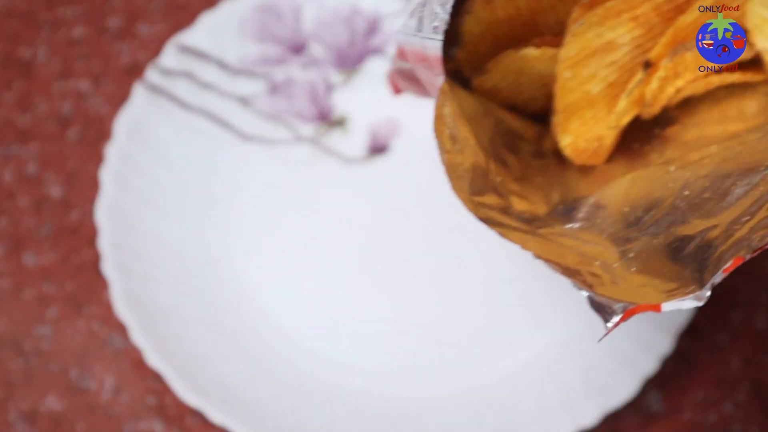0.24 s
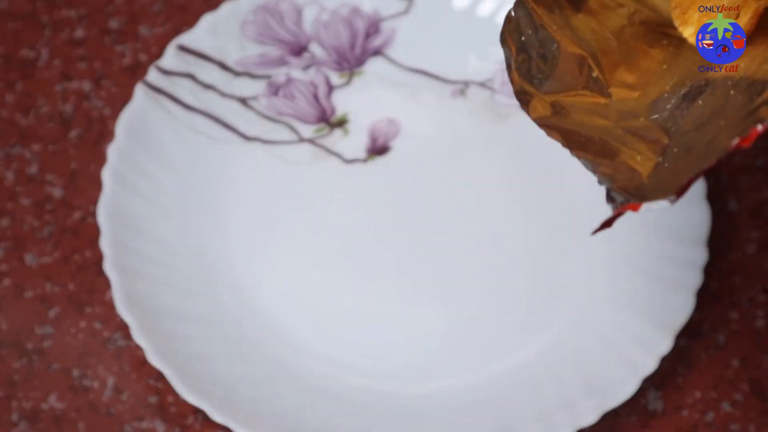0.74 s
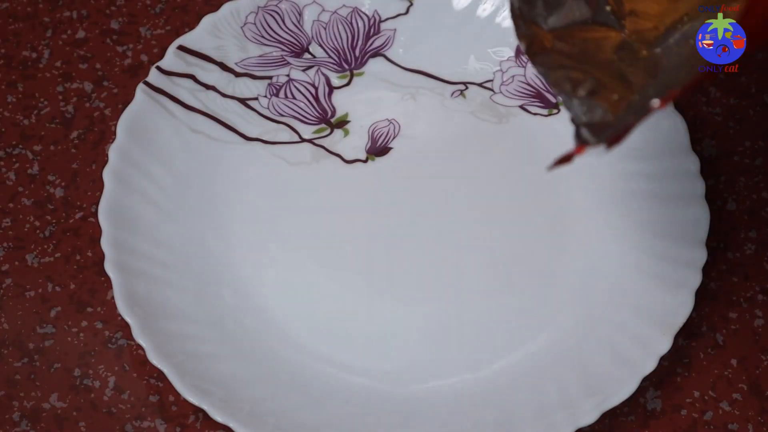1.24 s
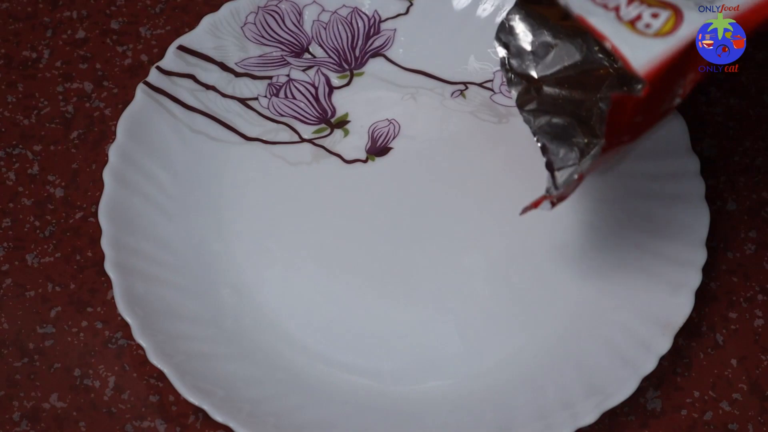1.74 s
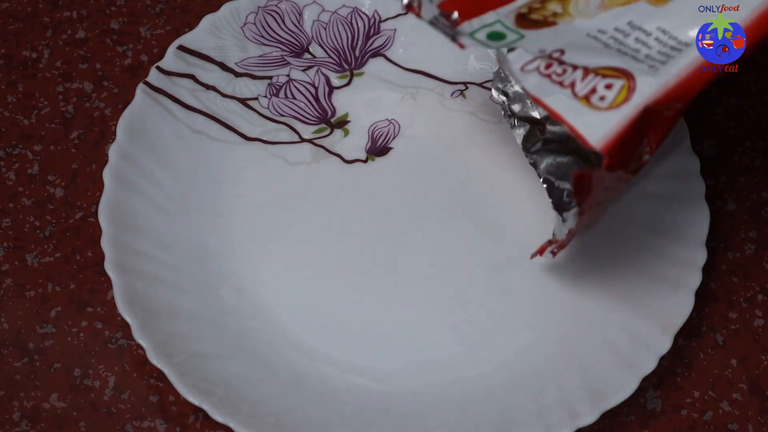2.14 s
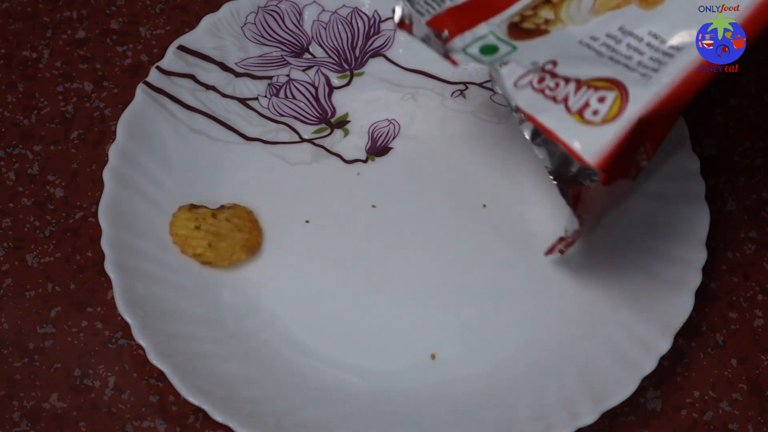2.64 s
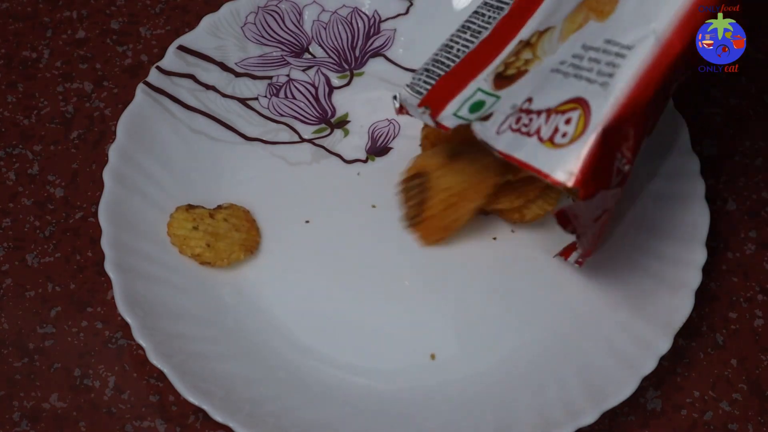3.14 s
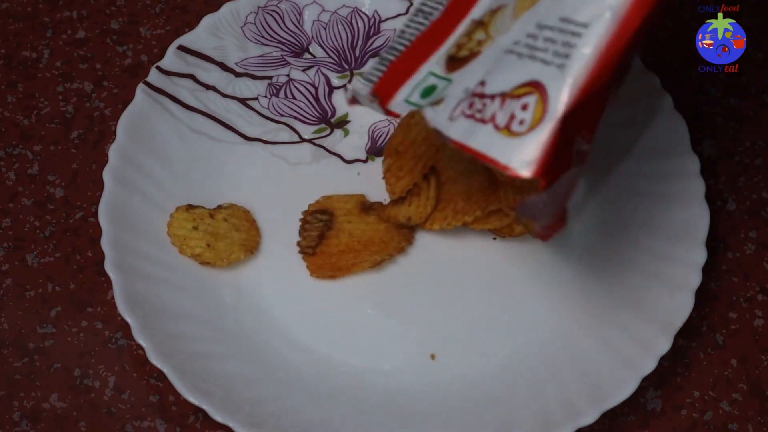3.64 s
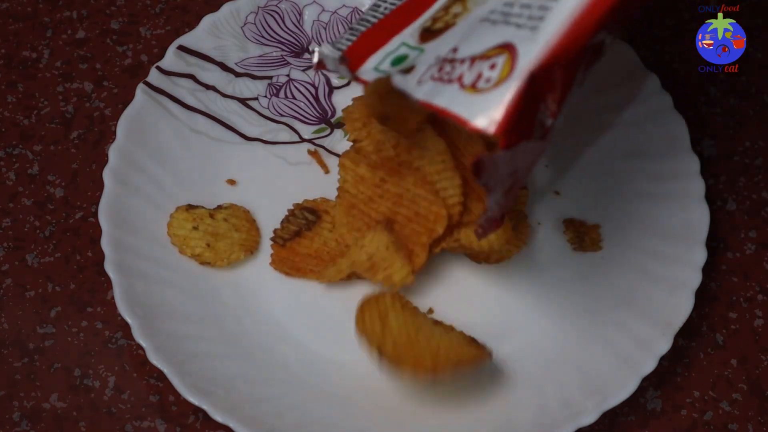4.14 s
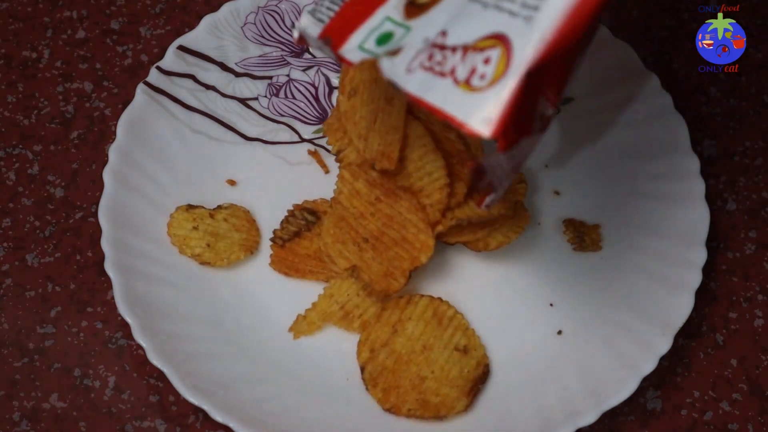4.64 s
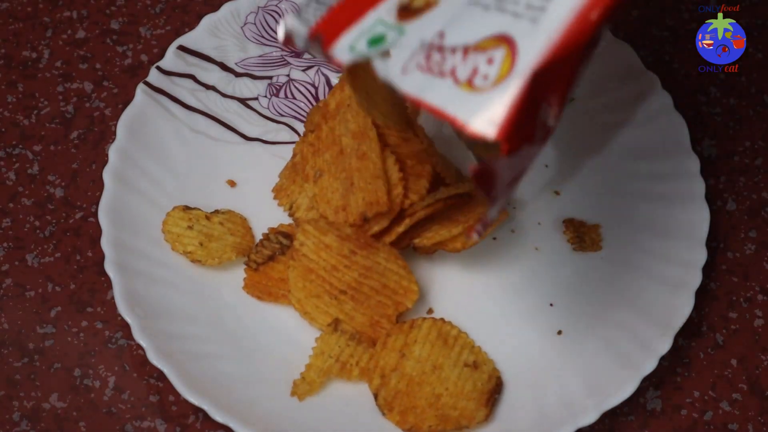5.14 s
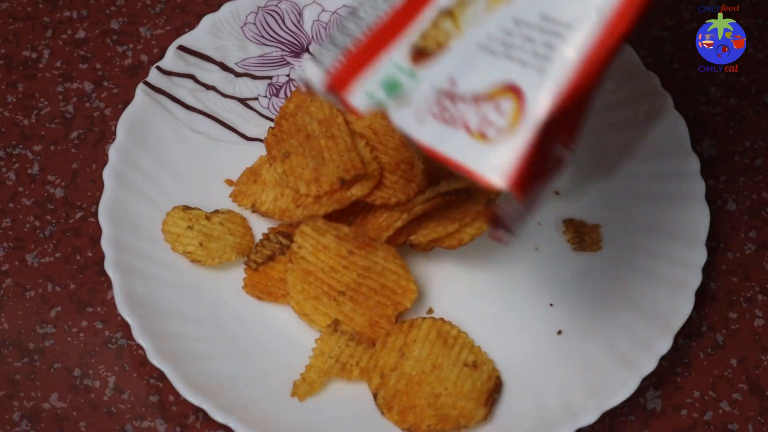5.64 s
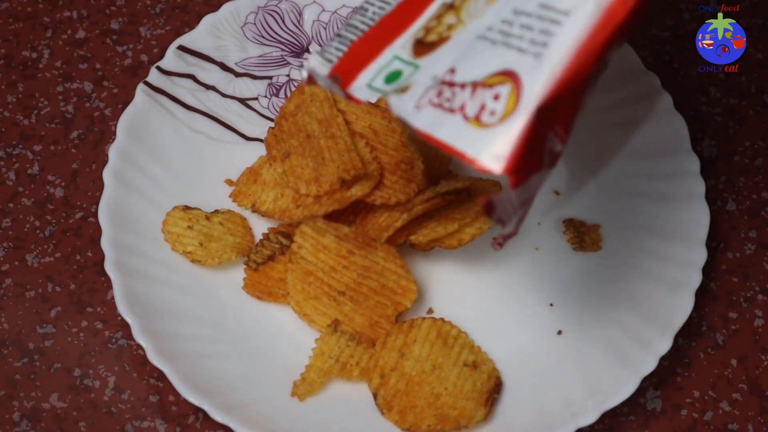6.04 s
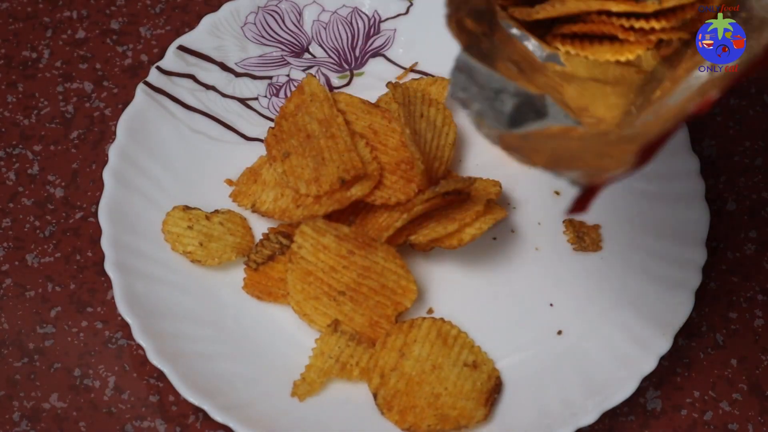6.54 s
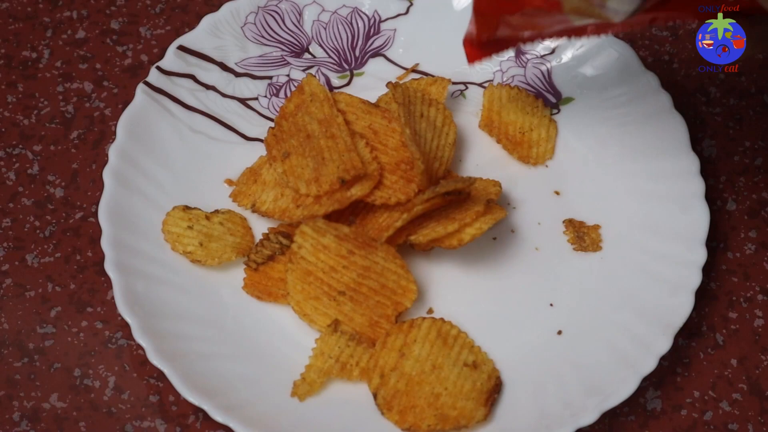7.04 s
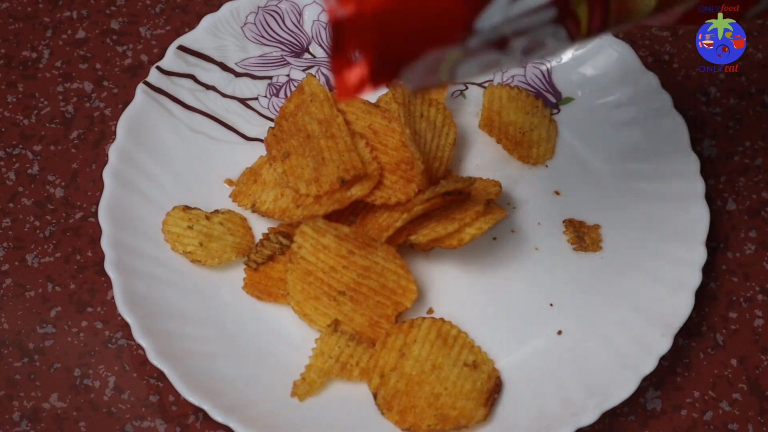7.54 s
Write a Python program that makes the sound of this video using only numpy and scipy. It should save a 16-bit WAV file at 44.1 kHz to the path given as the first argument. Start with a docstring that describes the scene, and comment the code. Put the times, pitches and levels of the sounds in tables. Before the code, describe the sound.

Short dry rustles and soft low hand bumps come first, then a near pause. Sharp crinkles return as the first crisps strike a china plate and ring it. The loudest foil crackle and sliding clatter come soon after, followed by lighter knocks and clinks, a quieter scraping, and a last burst of snapping foil. Close stereo pickup, bright reflections, short dense room tail, faint low background.

```python
"""Snack packet emptied onto a plate

A foil packet is tilted and shaken over a ceramic plate, close to the microphone in a small hard room.
Creases snap as click runs; foil and sliding crisps are pitched grains whose level follows the moves.
Crisps knock, drop out, ring the plate's modes and clink on the pile; the dragging mouth hums.
The hands bump softly at low pitch; early scatter and a dense stereo tail carry the clicks on.
"""
import sys
import numpy as np
from scipy import signal
from scipy.fft import rfft, irfft, next_fast_len
from scipy.io import wavfile
from scipy.ndimage import uniform_filter1d

SR = 44100
rng = np.random.default_rng(int(sys.argv[2]) if len(sys.argv) > 2 else 0)


def store_wav(level_fs):
    """Save 16-bit WAV to argv[1]."""
    pcm = np.round(np.clip(np.atleast_2d(level_fs), -1, 1) * 32767)
    wavfile.write(sys.argv[1], SR, pcm.T.astype(np.int16))


N = 343098
TIME = np.arange(N) / SR
TOP_HZ = 16200  # pitch ceiling of the grains and final cutoff

# spectrum of snaps and landing ticks: f/Hz, gain/dB
SNAP_SPECTRUM = [(100, -18), (350, -2.5), (1900, -4.5), (4200, -5), (6300, 0), (10500, 6.5), (12000, 0.5),
                 (15500, -27.5)]


def undb(db):
    """Decibels to amplitude gain."""
    return 10 ** (np.asarray(db) / 20)


def unit(x):
    """Scale to an rms of one."""
    return x / np.sqrt(np.mean(x ** 2))


def at_hz(hz, points):
    """Interpolate (f/Hz, value) points on a log-frequency axis."""
    f, value = np.transpose(points)
    return np.interp(np.log(hz + 1), np.log(f), value)


def colour(x, *spectra):
    """Minimum-phase filter, by folded cepstrum, whose gain is the sum of (f/Hz, gain/dB) spectra."""
    size = 2 * next_fast_len(x.shape[-1] // 2 + 2048)
    half = size // 2
    hz = np.arange(half + 1) * SR / size
    gain_db = sum(at_hz(hz, s) for s in spectra)
    cepstrum = irfft(np.log(undb(gain_db)))
    cepstrum[1:half] *= 2
    cepstrum[half + 1:] = 0
    response = np.exp(rfft(cepstrum))
    return irfft(rfft(x, size) * response)[..., :x.shape[-1]]


def add(out, s, sound):
    """Mix a sound into every channel of out, starting at s seconds."""
    start = max(int(s * SR), 0)
    part = sound[..., :N - start]
    out[:, start:start + part.shape[-1]] += part


def diffuse(size, null_hz=1500):
    """Stereo noise spectra as from two spaced microphones: alike in the bass, unrelated in the treble."""
    hz = np.arange(size // 2 + 1) * SR / size
    mid, side = rfft(rng.standard_normal((2, size)))
    alike = .88 * np.sinc(hz / null_hz)
    common = mid * np.sqrt(1 + alike)
    opposed = np.outer([1, -1], side * np.sqrt(1 - alike))
    return hz, (common + opposed) / np.sqrt(2)


def burst(decay_s, size=2048):
    """Exponentially decaying noise of unit energy."""
    x = rng.standard_normal(size) * np.exp(-TIME[:size] / decay_s)
    return x / np.linalg.norm(x)


def buckle(mean_delay_ms, first=1.0, count=10):
    """A crease gives way in one sharp click and a quick run of smaller ones; unit energy."""
    x = first * burst(0.00023)
    delays = np.minimum(rng.exponential(size=count), 4)  # in mean delays
    for delay, strength in zip(delays, rng.random(count)):
        late = int(delay * mean_delay_ms * SR / 1000)
        x += np.roll(burst(.0005), late) * strength / 2
    return x / np.linalg.norm(x)


def crunch(hz, mean_delay_ms=3):
    """Ridges of two crisps catch in a quick click run, coloured by the crisp's pitch; unit energy."""
    # spectrum of a knock: f/pitch [multiple], gain/dB
    spectrum = [(.3, -25), (.7, -9.5), (1, 2), (1.6, -10.5), (4, -27), (9, -51.5)]
    x = colour(buckle(mean_delay_ms), [(multiple * hz, db) for multiple, db in spectrum])
    return x / np.linalg.norm(x)


def ring(modes, size=20000):
    """Struck modes (f/Hz, level/dB, t60/s); each blow lands elsewhere and so weights them anew."""
    hz, db, t60_s = np.transpose(modes)[:, :, None]
    t = TIME[:size]
    gain = undb(db + rng.standard_normal(hz.shape))
    fade = np.exp(-np.log(1000) * t / t60_s)
    return np.sum(gain * np.sin(2 * np.pi * hz * t) * fade, axis=0)


def grains(rate, spread_db, low_hz, octaves, cycles, size, run_s=0):
    """Random tiny breaks, rate per second, mostly faint, each a decaying sine within octaves above low_hz."""
    when, strength, pitch, phase = rng.random((int(rate * N / SR), 4)).T[:, :, None]
    start, n = (when * N).astype(int), np.arange(size)
    if run_s:  # one crisp or facet rattles for run_s near its own pitch, then another takes over
        run_pitch = rng.random(N)[start // int(run_s * SR)]
        pitch = .85 * run_pitch + .15 * pitch
    base_hz = np.broadcast_to(low_hz, N)[start]
    hz = np.minimum(base_hz * 2 ** (octaves * pitch), TOP_HZ)
    gain = undb(-spread_db * np.log(.98 * strength + .02)) * hz
    fade = np.exp(-n * hz / (cycles * SR))
    waves = gain * fade * np.sin(2 * np.pi * (hz * n / SR + phase))
    return unit(np.bincount((start + n).ravel(), waves.ravel(), minlength=N)[:N])


def jamming(depth_db=2.5, hold_s=.024):
    """Uneven gain of things that slide, catch and break free: a random dB step every hold_s."""
    steps = np.repeat(rng.standard_normal(4000), int(hold_s * SR))[:N]
    return undb(abs(depth_db) * uniform_filter1d(steps, 128))


def stroke(start_s, length_s, release_db_per_s):
    """Gain of one movement of the hand: a quick rise, a slowly easing hold, a release."""
    attack_s, sag_db_per_s = 0.019, 27.5
    t = np.maximum(TIME - start_s, 0)
    loss_db = sag_db_per_s * t + release_db_per_s * np.maximum(t - length_s, 0)
    return np.minimum(t / attack_s, 1) * undb(-np.minimum(loss_db, 200))


def efforts():
    """Gains of foil bending and crisp sliding; overlapping moves add in power."""
    # tilts and shakes of the packet: start/s, length/s, foil effort/dB, sliding effort/dB
    moves = [(0.086, 0.19, -55.5, -56), (0.328, 0.11, -47, -62.5), (0.416, 0.11, -46, -46),
             (0.526, 0.2, -53.5, -54.5), (1.146, 0.11, -51, -50.5), (1.416, 0.072, -73.5, -63),
             (2.085, 0.54, -71, -85), (2.275, 0.09, -49, -52), (2.411, 0.049, -40.5, -39),
             (2.567, 0.096, -38.5, -61), (2.78, 0.14, -45, -39.5), (2.89, 0.45, -35.5, -33),
             (3.046, 0.13, -27.5, -29), (3.207, 0.27, -37.5, -36.5), (3.556, 0.21, -39.5, -38.5),
             (3.723, 0.056, -37.5, -45.5), (3.928, 0.087, -46, -64), (4.013, 0.1, -36, -49),
             (4.248, 0.16, -42, -49.5), (4.724, 0.055, -43.5, -62), (4.758, 0.087, -38, -45),
             (4.82, 0.083, -40, -41), (5.045, 0.0093, -50.5, -55), (5.24, 0.14, -35, -42),
             (6.478, 0.14, -46.5, -59), (6.732, 0.048, -47.5, -56), (7.017, 0.01, -53, -76.5),
             (7.108, 0.15, -44, -43), (7.241, 0.1, -32.5, -39.5), (7.389, 0.21, -42, -46),
             (7.597, 0.1, -40.5, -77)]
    crisp_lag_s = 0.0015
    foil_relax_db_per_s, crisp_settle_db_per_s = 168.5, 158
    foil_power, sliding_power = 0, 0
    for s, length_s, foil_db, sliding_db in moves:
        bend = undb(foil_db) * stroke(s, length_s, foil_relax_db_per_s)
        slide = undb(sliding_db) * stroke(s + crisp_lag_s, length_s, crisp_settle_db_per_s)
        foil_power = foil_power + bend ** 2
        sliding_power = sliding_power + slide ** 2
    return np.sqrt(foil_power), np.sqrt(sliding_power)


def cavity():
    """Air resonance of the packet over time, higher while it is squeezed or pressed on the pile."""
    # nominal resonance: t/s, f/Hz, relative level/dB
    track = [(0.3, 586.4, 0), (0.601, 779, -7), (1.95, 398, 6), (2.45, 440, -0.5), (2.802, 377, -3),
             (4.15, 374, 5), (4.348, 723, -5), (4.849, 717, 3), (5.298, 605.3, 1), (6.799, 636, -2),
             (7.0, 370, -1.5)]
    times, *columns = np.transpose(track)
    return [np.interp(TIME, times, column) for column in columns]


def background():
    """Faint steady stereo noise, strongest in the bass."""
    # spectrum: f/Hz, gain/dB
    spectrum = [(25, -9), (105, 1), (200, -11), (400, -12), (1500, -30), (5000, -44), (12000, -54)]
    level_db = -67.5
    return undb(level_db) * unit(colour(irfft(diffuse(N)[1]), spectrum))


def bumps(hz=108, rise_s=0.014, gain_db=3, rub_db=-7, size=12000):
    """Soft pushes of the hands: low cycles that swell and fade, with a lingering rub of the fingers."""
    # the fingers shift their grip: t/s, number of bumps, level before gain_db/dB
    grips = [(0.01, 2, -46.5), (1.2, 1, -47.5), (1.771, 3, -50), (2.328, 1, -45), (2.528, 1, -45),
             (3.072, 1, -42), (3.464, 1, -48), (3.739, 1, -42.5), (4.762, 4, -44), (5.32, 3, -48),
             (6.184, 3, -56.5), (6.566, 1, -46), (6.84, 1, -49.5)]
    rub_spectrum = [(25, -10.0), (100, 13.5), (170, -1.0), (400, -23.5), (3000, -73.5)]
    gap_s = 0.11
    out, t = np.zeros((2, N)), TIME[:size]
    swell = t / rise_s * np.exp(1 - t / rise_s)
    linger = swell ** 0.084 * (1 - t / t[-1])
    for s, count, db in grips:
        for k in range(round(count)):
            jitter = min(k, 1) * 0.084 * rng.standard_normal()  # none on the first bump
            late_s = gap_s * (k + jitter)
            bump_hz = hz * np.exp(0.07 * rng.standard_normal())
            thud = np.sin(2 * np.pi * bump_hz * t)
            rub = unit(colour(irfft(diffuse(size)[1]), rub_spectrum))
            push = swell * thud + undb(rub_db) * linger * rub
            add(out, s + late_s, undb(db + gain_db) * push)
    return out


def handling(foil_db=2, sliding_db=1, clack_db=-11, air_db=-11, wall_db=-12.0):
    """Bending foil crackles brightly while the crisps grate and clack inside and stir the cavity."""
    # spectra: f/Hz, gain/dB
    foil_spectrum = [(800, -35.5), (2500, -3.5), (4300, 5.5), (6300, 5.5), (8000, 7), (10800, 8.5),
                     (12200, 1), (15000, -25)]
    sliding_spectrum = [(120, -17.5), (330, 3.5), (650, 0), (1100, 1.5), (2000, 3), (3200, 2.5),
                        (8000, -23)]
    foil_gain, sliding_gain = efforts()

    # a shifting crisp also dents the foil, so the two share their sharpest clicks
    both = grains(rate=450, spread_db=3.5, low_hz=4140, octaves=1.46, cycles=0.26, size=32)
    facets = grains(rate=1500, spread_db=4, low_hz=2700, octaves=2.2, cycles=10, size=300, run_s=.014)
    foil = unit(unit(colour(facets, foil_spectrum)) + 1.7 * unit(colour(both, foil_spectrum)))

    grating = grains(rate=1300, spread_db=4.2, low_hz=620, octaves=3, cycles=2.2, size=300)
    clacks = grains(rate=400, spread_db=3, low_hz=1100, octaves=2.1, cycles=12, size=1500, run_s=.022)
    cavity_hz, cavity_db = cavity()
    air = grains(rate=200, spread_db=1, low_hz=.88 * cavity_hz, octaves=.33, cycles=10, size=2500)
    air = air * undb(cavity_db)
    # the slack walls flap below the air resonance, less when they are pulled taut
    slack = (cavity_hz.min() / cavity_hz) ** 2
    walls = grains(rate=300, spread_db=3, low_hz=205, octaves=.8, cycles=3.5, size=2500) * slack
    boom = undb(air_db) * air + undb(wall_db) * walls
    grate = unit(colour(grating + both, sliding_spectrum))
    clack = undb(clack_db) * unit(colour(clacks, sliding_spectrum))
    sliding = unit(grate + clack + boom)
    return undb(foil_db) * foil * foil_gain + undb(sliding_db) * sliding * sliding_gain * jamming()


def drags(release_db_per_s=220):
    """The mouth of the packet sticks and slips, and each slip rings its cavity."""
    # drags of the mouth: start/s, length/s, level/dB
    pulls = [(0.148, 0.33, -62), (1.94, 0.19, -63.5), (5.339, 0.62, -53), (6.047, 0.019, -59),
             (6.749, 0.067, -57)]
    slips = grains(rate=90, spread_db=2, low_hz=.9 * cavity()[0], octaves=.2, cycles=10, size=4000)
    hum = unit(colour(slips, [(200, -25), (360, 0), (720, 0), (1400, -40)]))
    gain = sum(undb(db) * stroke(s, length_s, release_db_per_s) for s, length_s, db in pulls)
    return hum * jamming(depth_db=6) * gain


def snaps(gain_db=-4.0, mean_delay_ms=2.6):
    """Loud creases giving way, each with its own body and sheen."""
    # t/s, level before gain_db/dB, body below 1 kHz/dB, sheen above 6 kHz/dB
    creases = [(0.445, 10, 14.5, -8), (0.626, -3.5, -2, -7), (1.1684, 12.5, -9, -11), (2.421, 14, 0, -10.5),
               (2.766, 10, 0, -18), (2.8564, 13, -6.5, -9.5), (2.9032, 12, -1.5, -19), (2.936, 6, -1, -18),
               (3.042, 18, -0.5, -14), (3.0681, 18, 6.5, -9.5), (3.0787, 26.5, -13, -32),
               (3.141, 0.5, 3, 10.5), (3.3546, 14.5, -4, -18), (3.366, 9.5, 1, -11), (3.5356, 11, 0.5, -26),
               (3.801, -2.5, 9, -3), (4.056, 2, 4.5, -22), (4.8886, 16, -8, -5), (5.2626, 16.5, -4, -36),
               (5.507, -12, -19, 4.5), (5.5221, -2.5, -16, 2.5), (5.683, -15, -5.5, 5.5),
               (6.4955, -4, -26.5, -24.5), (6.762, -5, 1, 3.5), (7.222, 15.5, -18, -3.5),
               (7.2793, 13.5, 0.5, -27), (7.2891, 13.5, -15, -4.5), (7.294, 13, -4, -8),
               (7.31, 13.5, -16, -18), (7.3268, 15, -30, 1), (7.51, 14.5, -4.5, -14),
               (7.6008, 17.5, -19.5, -2)]
    out = np.zeros((1, N))
    for s, db, body_db, sheen_db in creases:
        tilt = [(300, body_db - 6.0), (850, body_db), (1700, 0.01), (4600, 0.01), (7500, sheen_db)]
        click = colour(buckle(mean_delay_ms), SNAP_SPECTRUM, tilt)
        add(out, s, undb(db + gain_db) * click)
    return out[0]


def knocks(gain_db=15.0):
    """Crisps knock and crunch on each other and the packet: short dull click runs, each at its pitch."""
    # t/s, f/Hz, level before gain_db/dB
    hits = [(0.531, 1120, -30.5), (0.5812, 1120, -21.5), (0.619, 1370, -25), (0.715, 1100, -33),
            (0.798, 1250, -35), (2.813, 1360, -15), (2.911, 1080, -21), (3.556, 2500, -22),
            (3.638, 1430, -25.5), (3.709, 2350, -24.5), (3.958, 4600, -30), (4.2677, 4160, -12),
            (4.411, 4600, -27.5), (5.583, 1880, -31), (5.6415, 780, -22.5), (5.7325, 743, -42),
            (5.7615, 2030, -37), (5.8194, 736, -26.5), (6.55, 1800, -29.5), (6.804, 1610, -36.5),
            (7.122, 1900, -30.5), (7.131, 3060, -24), (7.511, 1350, -18.5)]
    out = np.zeros((1, N))
    for s, hz, db in hits:
        add(out, s, undb(db + gain_db) * crunch(hz))
    return out[0]


def landings(plate_db=-0.5, size=20000):
    """A hard crisp ticks on the glaze and sets the plate ringing; gives ticks and rings."""
    # crisps landing: t/s, tick level/dB, ring level before plate_db and muffling/dB
    drops = [(2.5264, 7, -22.5), (2.5504, 8, -31), (2.6271, 3, -41), (3.2389, -4, -26), (3.338, 0, -26),
             (3.5372, -4.5, -31.5), (4.099, -4.5, -28), (4.267, 9.5, -18.5), (4.3166, 4, -37.5),
             (4.348, 1.5, -40), (4.8898, -8.5, -15), (5.182, -52, -33), (5.288, -12, -21.5)]
    # plate modes before muffling, the lowest two beating: f/Hz, level/dB, t60/s
    plate_modes = [(1840, -3, 0.33), (1850, -2.5, 0.31), (3170, -11.5, 0.097), (10650, -17.5, .2)]
    tick_tilt = [(600, -27.5), (1700, 3.0), (4600, 2.0), (7500, -6)]
    # the growing pile lowers the ring and speeds its decay, per second of pouring
    muffle_db_per_s, damping_db_per_s2 = 4.5, 112.5
    ticks, rings = np.zeros((2, 1, N))
    for s, tick_db, ring_db in drops:
        poured_s = s - drops[0][0]
        muffle_db = poured_s * (muffle_db_per_s + damping_db_per_s2 * TIME[:size])
        tick = colour(buckle(mean_delay_ms=0.92), SNAP_SPECTRUM, tick_tilt)
        add(ticks, s, undb(tick_db) * tick)
        add(rings, s, undb(plate_db + ring_db - muffle_db) * ring(plate_modes, size))
    return ticks[0], rings[0]


def tumbling(clink_db=-7):
    """Crisps out of the packet clink against each other on the pile, as hard as the packet is shaken."""
    # span of the tumbling: start/s, end/s
    span_s = (4.03, 6.5)
    taps = grains(rate=260, spread_db=2.5, low_hz=1250, octaves=2.1, cycles=16, size=2000, run_s=.03)
    on_pile = uniform_filter1d(1. * ((TIME > span_s[0]) & (TIME < span_s[1])), 4096)
    return undb(clink_db) * taps * on_pile * np.hypot(*efforts())


def clinks(t60_s=0.063, contact_db=14):
    """A loose crisp strikes the pile with a crunch and rings briefly at one pitch."""
    # t/s, f/Hz, ring level/dB
    strikes = [(4.157, 1504, -37), (4.174, 1527, -37), (4.207, 1530, -48.5), (4.421, 2088, -37),
               (4.703, 4180, -48), (4.7591, 1367, -35), (4.776, 1365, -32.5), (4.793, 1394, -33.5),
               (4.856, 2478, -27.5)]
    out = np.zeros((1, N))
    for s, hz, db in strikes:
        add(out, s, undb(db) * ring([(hz, 0, t60_s)]))
        add(out, s, undb(db + contact_db) * crunch(hz))
    return out[0]


def scatter(x, near_db=1, decay_s=0.0056, hold_s=.016, count=6):
    """Plate, table and moving packet throw clicks back within milliseconds, by paths that keep changing."""
    spectrum = [(400, 3), (1000, 4.5), (1800, 7), (4500, 7.5), (9000, 0)]
    turn = np.repeat(rng.integers(count, size=4000), int(hold_s * SR))[:N]  # path set in use
    out = 0
    for k in range(count):
        hz, noise = diffuse(2048)
        paths = irfft(noise * undb(at_hz(hz, spectrum))) * np.exp(-TIME[:2048] / decay_s)
        paths *= undb(near_db) * np.sqrt(2) / np.linalg.norm(paths)
        paths[:, 0] += 1  # direct sound
        share = uniform_filter1d(1. * (turn == k), 256)
        out = out + signal.oaconvolve((x * share)[None], paths, axes=1)[:, :N]
    return out / np.sqrt(1 + undb(2 * near_db))


def room(x, wet_db=-1, build_s=0.00057, size=32768):
    """Hard walls answer with a dense stereo tail, each band of noise decaying at its own rate."""
    # bands: centre f/Hz, t60/s, echo level before wet_db/dB
    bands = [(210, 0.072, -1), (1040, 0.29, 2), (2500, 0.32, 2), (4600, 0.29, -2), (12400, 0.12, -3)]
    hz, noise = diffuse(size)
    t, tail = TIME[:size], 0
    for band, (_, t60_s, db) in enumerate(bands):
        share = at_hz(hz, [(row[0], k == band) for k, row in enumerate(bands)])
        fade = np.exp(-np.log(1000) * t / t60_s) * (1 - np.exp(-(t / build_s) ** 2))
        tail = tail + undb(db) * irfft(noise * share) * fade / np.linalg.norm(fade)
    return undb(wet_db) * signal.fftconvolve(x[None], tail, axes=1)[:, :N]


def room_boom(x):
    """Clicks excite a few low modes of the room."""
    # f/Hz, level/dB, t60/s
    modes = [(357.9, -58, .35), (440, -56.5, 0.35), (743, -55, .28)]
    return signal.fftconvolve(x, ring(modes))[:N]


def scene(near_room_db=-6):
    """Packet, crisps and plate in the room; plate and knocking crisps are nearest, so send less to it."""
    ticks, plate = landings()
    clicks = snaps() + ticks + handling() + tumbling()
    knocking = knocks()
    rings = clinks() + drags()
    echo = room(clicks + rings + undb(near_room_db) * (plate + knocking))
    near = scatter(clicks + knocking) + rings + plate
    return near + echo + room_boom(clicks) + bumps() + background()


def record(dry, balance_db=-0.93):
    """The right side is a little louder; peaks clip at full scale, then the top is cut."""
    sides_db = np.array([[balance_db], [-balance_db]]) / 2
    sound = np.clip(dry * undb(sides_db), -1, 1)
    top_cut = signal.ellip(8, .2, 70, TOP_HZ, fs=SR, output="sos")
    return signal.sosfilt(top_cut, sound)


dry = scene()
out = record(dry)
store_wav(out)
```